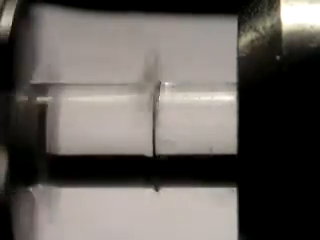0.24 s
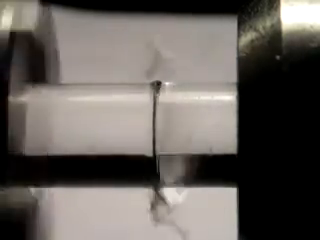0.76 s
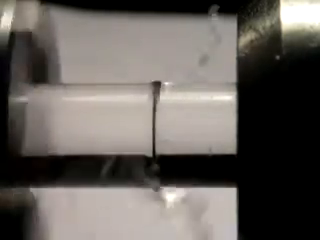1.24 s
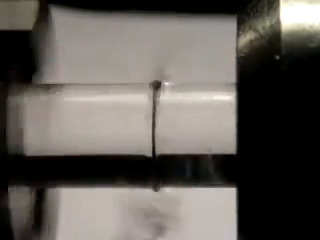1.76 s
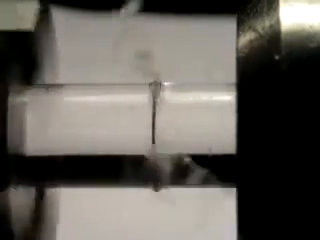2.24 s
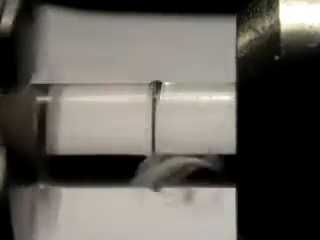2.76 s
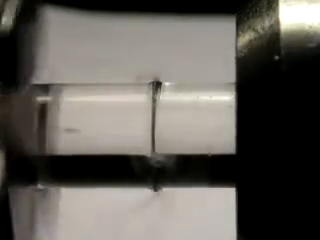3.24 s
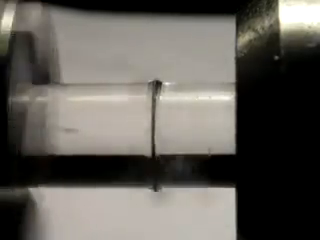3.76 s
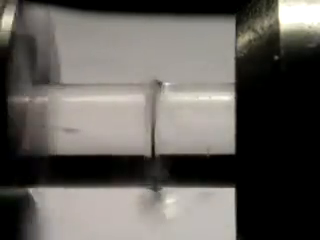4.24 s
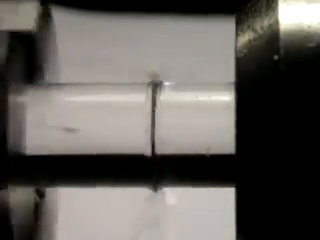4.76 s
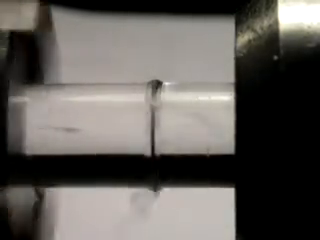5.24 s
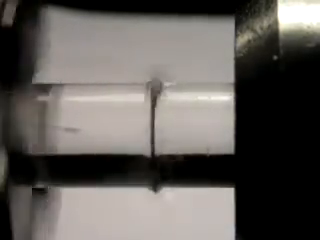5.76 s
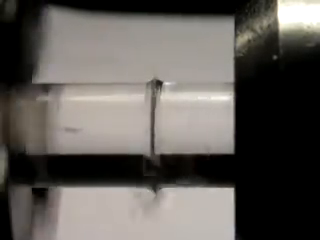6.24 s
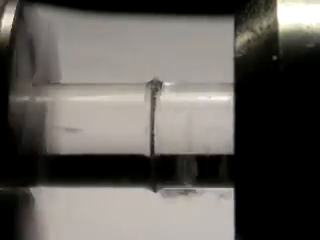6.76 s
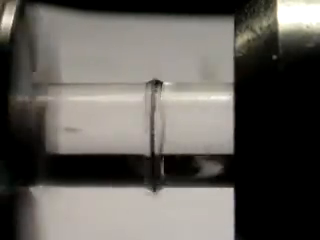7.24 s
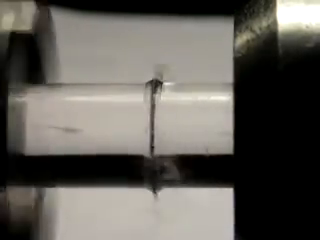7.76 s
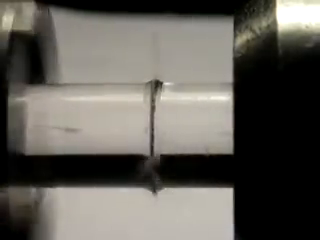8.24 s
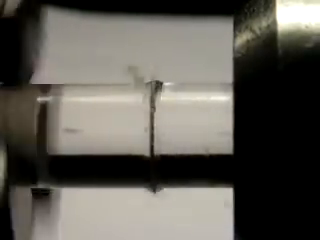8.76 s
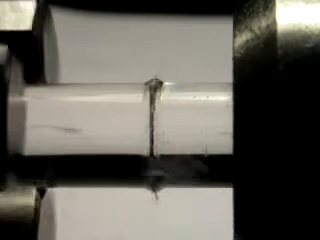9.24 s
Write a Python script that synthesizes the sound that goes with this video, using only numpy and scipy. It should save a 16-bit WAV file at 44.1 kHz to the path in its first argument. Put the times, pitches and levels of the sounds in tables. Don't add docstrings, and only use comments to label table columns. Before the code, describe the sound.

Close, loud rattling gear whir of a small bench lathe with rubbing plastic rods; switch thud, slowing knocks, short groans, then near silence.

```python
import sys
import numpy as np
from scipy import signal
from scipy.fft import rfft, irfft
from scipy.io import wavfile
from scipy.ndimage import uniform_filter1d, minimum_filter1d

SR = 44100
rng = np.random.default_rng(int(sys.argv[2]) if len(sys.argv) > 2 else 0)


def how_loud(loudness_db):
    steps = np.asarray(loudness_db, float) / 20
    return 10 ** steps


def persist_wave(psi):
    counts = np.round(np.clip(psi, -1, 1) * 32767).astype(np.int16)
    wavfile.write(sys.argv[1], SR, np.atleast_2d(counts).T)


N = 418509
SECONDS = np.arange(N) / SR
MAINS_RIPPLE_HZ = 100.162


def rms_one(x):
    return x / np.sqrt(np.mean(x ** 2) + 1e-20)


def place(times, values):
    out = np.zeros(N)
    np.add.at(out, np.round(np.asarray(times) * SR).astype(int), values)
    return out


def fade(x, seconds):
    r = np.exp(-1 / (max(seconds, 1e-4) * SR))
    return signal.lfilter([np.e * (1 - r)], [1, -2 * r, r * r], x + 1e-18)


def drift(rate_hz):
    r = np.exp(-2 * np.pi * rate_hz / SR)
    noise = rng.standard_normal(N + SR)
    return rms_one(signal.lfilter([1], [1, -2 * r, r * r], noise)[SR:])


def motor_hum(level_db=-63):
    powered = SECONDS < SWELLS[0][0]
    return how_loud(level_db) * np.cos(2 * np.pi * (MAINS_RIPPLE_HZ * SECONDS + .125)) * powered


# t/s, level/dB (peak), f/Hz, length/s
SWELLS = [
    (8.66, -13, 318, 0.012),
    (8.672, -8, 1140, .012),
    (9.0, -27, 350, .06),
    (9.052, -15.5, 610, .01),
    (9.045, -21, 350, 0.074),
    (9.191, -17, 1300, 0.0092),
    (9.235, -25.5, 365, .07),
    (9.28, -26, 325, .07),
    (9.13, -40, 210, .2),
    (9.41, -30, 300, 0.045),
]


def bench():
    out = np.zeros(N)
    for s, peak_db, hz, length_s in SWELLS:
        swell = np.sin(np.pi * np.clip((SECONDS - s) / length_s, 0, 1))
        out += how_loud(peak_db) * swell * np.sin(2 * np.pi * hz * (SECONDS - s))
    return out


# f/Hz, level/dB (per Hz)
COLOUR = [(47, -47.0), (188, -40.5), (281, -23.0), (529, -23.6), (557, -12.7), (1010, -16.5), (1057, -6.4),
          (1515, -15.0), (1690, -18.4), (1784, -10.0), (2474, -19.1), (3068, -9.4), (3993, -37.5),
          (5140, -58.1)]
# f/Hz, width/Hz, level/dB
MODES = [(201, 16, 6.3), (300, 18, 11.8), (337, 21, 9.5), (411, 25, 4.6), (449, 15, 7.8), (502, 12, 9.2),
         (619, 14, 6.9), (644, 13, 13.3), (684, 5, -5.0), (697, 7, 10.2), (729, 10, -4.7), (745, 8, 6.5),
         (799, 10, 0.9), (867, 66, 7.9), (930, 16, -5.5), (944, 5, 10.2), (1131, 13, 1.3), (1201, 28, 4.9),
         (1294, 55, 9.3), (1383, 32, 10.2), (1412, 26, -8.5), (1440, 75, 8.6), (1958, 21, 5.6),
         (2070, 20, 4.0), (2263, 47, 4.2), (2577, 150, 6.6), (2689, 147, -6.3), (2766, 93, 11.5),
         (2901, 120, 6.3), (4545, 1286, 14.4)]
PART_EDGES_HZ = (520, 1600, 2650, 3300)


def body_responses(size=16384):
    hz = np.maximum(np.arange(size // 2 + 1) * SR / size, 1)
    colour_hz, colour_db = np.transpose(COLOUR)
    level_db = np.interp(np.log(hz), np.log(colour_hz), colour_db)
    for centre_hz, width_hz, lift_db in MODES:
        level_db = level_db + lift_db / (1 + (2 * (hz - centre_hz) / width_hz) ** 2)
    below = [0] + [1 / (1 + (hz / edge) ** 16) for edge in PART_EDGES_HZ] + [1]
    energy = np.bincount(np.searchsorted(PART_EDGES_HZ, hz), how_loud(level_db) ** 2) * 2 / size
    energy[-1] = energy[-2]
    parts = []
    for lower, upper, band_energy in zip(below, below[1:], energy):
        band = how_loud(level_db) * np.sqrt(np.abs(upper - lower) / band_energy)
        cepstrum = irfft(np.log(band + 1e-7))
        cepstrum[1:size // 2] *= 2
        ring = irfft(np.exp(rfft(cepstrum[:size // 2], size)))
        parts.append(ring[:size // 2])
    return parts


# t/s, level/dB (peak), cover share/dB
SLACK = [(8.835, -7, -5), (8.893, -8, -12), (8.932, -4, 8), (8.985, -14, 1.5), (9.065, -17, 1.5),
         (9.103, -11.5, 9), (9.112, -13, 9), (9.123, -16, 8.5), (9.1905, -17.5, 1.5), (9.212, -25, 1.5),
         (9.2974, -30.5, 3), (9.334, -15, -4), (9.372, -29, -3), (9.398, -13, 0.5), (9.414, -7, -3.5),
         (9.4234, -11.5, 1.5)]


def slack_knocks(decay_s=0.0052):
    frame, headstock, gear_box, cover, hiss = body_responses()
    t = np.arange(2000) / SR
    out = np.zeros(N)
    for s, peak_db, cover_db in SLACK:
        burst = rng.standard_normal(2000) * np.exp(-t / decay_s)
        ring = headstock + how_loud(cover_db) * (gear_box + cover + 1.36 * hiss)
        knock = np.convolve(burst, ring[:3000])
        knock = how_loud(peak_db) * knock / np.abs(knock).max()
        at = round(s * SR)
        out[at:at + len(knock)] += knock[:N - at]
    return out


# t/s, level/dB (peak), f/Hz
PUFFS = [(0.049, -4, 2820), (0.1808, 0, 2800), (0.3707, -8, 2730), (0.6325, -5, 2850), (1.2702, -3, 3020),
         (1.877, -5, 2940), (2.4064, -6, 2750), (2.784, -3, 2820), (3.057, -3.5, 2860), (3.105, -4, 2840),
         (3.542, -5, 2970), (4.054, -2, 2900), (4.2353, -4, 2800), (4.6433, -6, 2730), (4.691, 1, 2960),
         (4.7526, -3, 2850), (4.8505, -3, 2890), (5.0723, -5, 2800), (5.271, -5, 2860), (5.5917, 2, 2830),
         (5.9024, -1, 2870), (6.14, -4, 2880), (6.2118, -3.5, 2830), (6.231, -4, 2880), (6.3004, -4, 3080),
         (6.6887, 0, 2910), (6.7605, -7, 2810), (7.0673, -6, 2840), (7.2924, 1, 2830), (8.1367, -1, 3060)]


def all_puffs():
    crests = np.arange(1, int(COAST[0][0] * MAINS_RIPPLE_HZ))
    pick, pitch = rng.random((len(crests), 2)).T
    late, size = rng.standard_normal((len(crests), 2)).T
    times = (crests + .05 + .15 * late) / MAINS_RIPPLE_HZ
    peaks_db = -12 + 3 * size
    low_hz, high_hz = 2716, 3020
    rows = np.transpose([times, peaks_db, low_hz + (high_hz - low_hz) * pitch])
    return np.concatenate([PUFFS, rows[pick < .065]])


def cover_puffs(puffs, length_s=0.0057, trim_db=-3.0):
    t = np.arange(600) / SR
    swell = np.sin(np.pi * np.clip(t / length_s, 0, 1)) ** 2
    out = np.zeros(N)
    for s, peak_db, hz in puffs:
        at = max(round((s - .0008) * SR), 0)
        tone = np.sin(2 * np.pi * (hz * t + rng.random()))
        out[at:at + 600] += how_loud(peak_db + trim_db) * swell * tone
    return out


# level/dB, creep/(dB/s), share of early slowing, knee/dB, share of late slowing
PARTS = [
    (-36, 0.34, .05, -11, .1),
    (-18.5, 0.003, -0.11, -7.5, 0.99),
    (-23, -0.19, -0.11, -9, 1.64),
    (-18.5, 0, 1.01, -10, 1.12),
]
# t/s, level/dB
COAST = [
    (8.6, 0.5),
    (8.79, -3.5),
    (8.89, -8.5),
    (8.99, -10.5),
    (9.1, -14),
    (9.16, -18),
    (9.37, -22.5),
    (9.44, -20),
    (9.49, -30),
]


def part_levels():
    coast_db = np.interp(SECONDS, *np.transpose(COAST))
    levels_db = []
    for run_db, creep, early, knee_db, late in PARTS:
        early_db = early * np.maximum(coast_db, knee_db)
        late_db = late * np.minimum(coast_db - knee_db, 0)
        levels_db.append(run_db + creep * SECONDS + early_db + late_db)
    return levels_db


# f/Hz, depth/dB
PACING = [
    (6.22, 1.0),
    (12.44, .7),
    (28.95, 1.4),
    (31.05, 1.1),
    (43.5, 1.2),
    (57.9, .55),
    (86.85, .6),
    (144.75, .6),
]


def rattle(ripple_db, chance_db, top_db):
    powered = SECONDS < SWELLS[0][0]
    ripple = np.cos(2 * np.pi * (MAINS_RIPPLE_HZ * SECONDS - .2))
    load_db = ripple_db * ripple * how_loud(1.5 * drift(7.6))
    for hz, depth_db in PACING:
        load_db = load_db + 1.12 * depth_db * np.cos(2 * np.pi * (hz * SECONDS + rng.random()))
    load_db = load_db * powered + chance_db * drift(130)
    return top_db * np.tanh(load_db / top_db)


def lathe(puffs):
    *levels_db, cover_db = part_levels()
    hiss_db = np.maximum(cover_db - 1.2, -41)
    levels_db = levels_db + [cover_db + 0.2, hiss_db]
    load_db = rattle(ripple_db=2.0, chance_db=2.5, top_db=5.5)
    hardest = fade(place(puffs[:, 0] - .001, how_loud(puffs[:, 1] + 6)), .0015)
    contacts = rng.standard_normal((2, N))
    load_shares = (0.27, 0.61, .65, 1.37, 0.84)
    knock_shares = (0.088, 0.42, 0.48, 0.22, 0.47)
    parts = zip(body_responses(), levels_db, load_shares, knock_shares)
    out = np.zeros(N)
    for k, (ring, level_db, follows, knock) in enumerate(parts):
        strength = rms_one(how_loud(follows * load_db + 1.11 * drift(27))) + knock * hardest
        rung = signal.oaconvolve(contacts[k % 2] * strength, ring)
        rung[:len(ring) - 1] += rung[N:]
        out += how_loud(level_db) * rung[:N]
    return out


def scene():
    puffs = all_puffs()
    mix = motor_hum() + bench() + slack_knocks() + cover_puffs(puffs) + lathe(puffs)
    return mix[None]


# t/s, level/dB (clipped corner)
OVERLOADS = [(0.182, -43), (0.2708, -45), (0.5756, -42), (0.6459, -28), (0.8599, -28), (1.2281, -48),
             (1.4765, -39), (1.6696, -50), (2.0901, -28), (2.577, -43), (2.7861, -27), (3.1088, -56),
             (3.5423, -60), (4.2817, -55), (5.1746, -37), (5.247, -33), (5.2714, -52), (5.5917, -49),
             (5.8446, -50), (6.4004, -48), (7.0, -31), (7.3317, -42), (7.3991, -49), (8.302, -35),
             (8.4582, -43), (8.4956, -42), (8.5295, -35)]


def clipped_corners():
    times, levels_db = np.array(OVERLOADS).T
    corners = place(times + 0.0007, how_loud(levels_db + 11))
    band = signal.butter(1, [3000, 10000], "band", fs=SR, output="sos")
    return signal.sosfilt(band, corners + 1e-18)


def top_cut(x):
    return signal.sosfilt(signal.butter(12, 15830, fs=SR, output="sos"), x)


def record(dry):
    ceiling, offset = .67, -.0169
    room_left = minimum_filter1d(np.minimum(1, ceiling / (np.abs(dry + offset) + 1e-9)), size=161)
    limited = dry * uniform_filter1d(uniform_filter1d(room_left, size=80), size=80)
    run_in = np.concatenate([limited[:, 500:0:-1], limited], axis=1)
    band_cut = signal.ellip(10, .5, 40, 5120, fs=SR, output="sos")
    narrow = signal.sosfilt(band_cut, run_in)[:, 500:]
    shifted = narrow * np.cos(2 * np.pi * 6350 * SECONDS)
    image = 0
    for band_hz, lift_db in (([7500, 8900], -7), ([8900, 10200], .1), ([10200, 10900], 11)):
        band = signal.butter(5, band_hz, "band", fs=SR, output="sos")
        image = image + how_loud(lift_db) * signal.sosfilt(band, shifted)
    return top_cut(narrow + how_loud(-61) * image + clipped_corners() + offset)


dry = scene()
out = record(dry)
persist_wave(out)
```